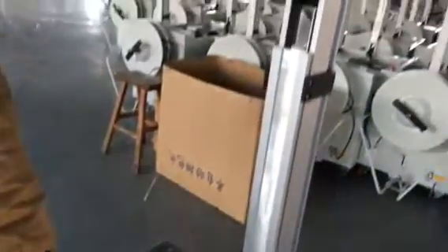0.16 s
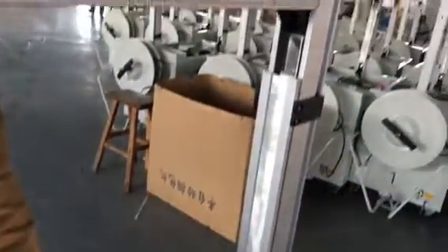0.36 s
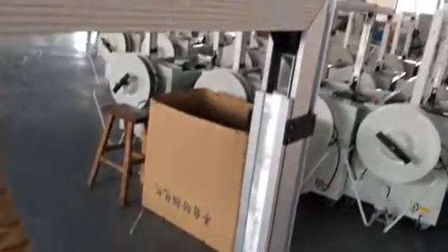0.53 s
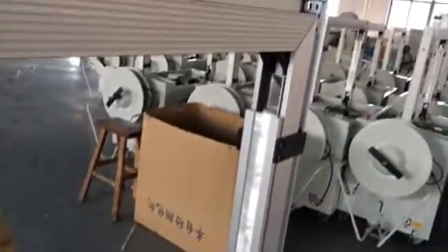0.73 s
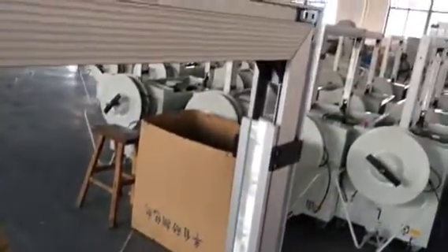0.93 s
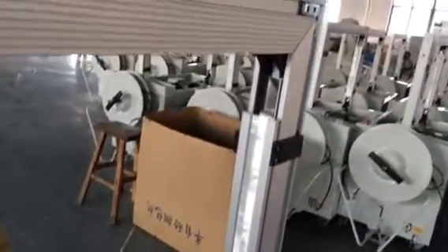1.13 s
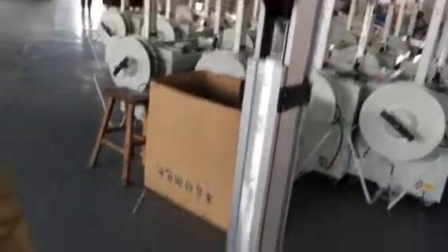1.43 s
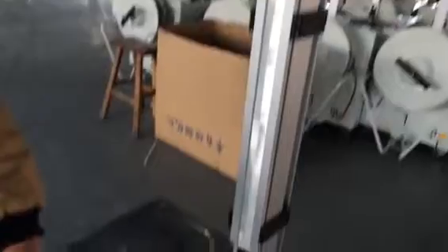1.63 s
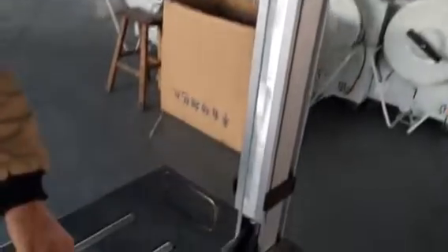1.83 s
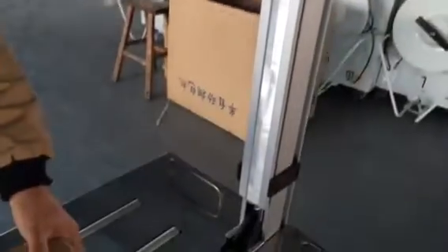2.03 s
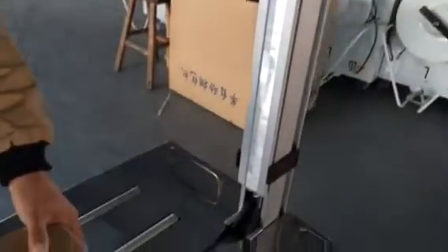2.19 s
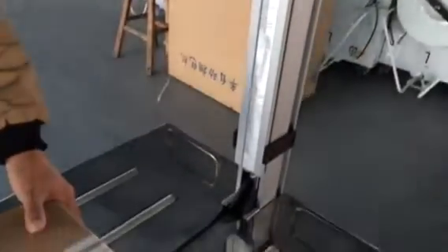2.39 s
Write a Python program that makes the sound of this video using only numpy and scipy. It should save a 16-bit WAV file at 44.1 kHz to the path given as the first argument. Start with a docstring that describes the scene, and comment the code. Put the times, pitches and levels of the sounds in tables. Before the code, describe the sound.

A strapping machine cycles close by in an echoing workshop with low hum. Carton scuffs at 0.2 s precede a hard double clunk at 0.31. Rollers whine and plastic strap hisses from 0.45, snapping at 1.05. After a brief lull, strap rattles harshly from 1.27 to 1.73 over singing rollers, with a heavy thump at 1.63 and closing double knock. Soft scuffs and metallic table bumps follow from 2.0 to 2.35.

```python
"""A low hum, workshop noise and the thin whine of idling rollers open the scene: shaped noise and narrow resonances.
A strapping machine then runs one cycle. Clamps knock (damped modes and noise bursts), and the plastic strap hisses
along its guide (stick-slip noise) and snaps tight. It rattles loudly through the arch while the rollers sing.
The singing ends with a double knock, and the carton is slid over the table with scuffs and ringing bumps."""
import sys
import numpy as np
from scipy import signal
from scipy.fft import rfft, irfft, next_fast_len
from scipy.io import wavfile

SR = 44100
rng = np.random.default_rng(int(sys.argv[2]) if len(sys.argv) > 2 else 0)


def to_wav(s):
    """Save 16-bit WAV."""
    ch = np.atleast_2d(s).T  # columns
    pcm = np.round(np.clip(ch, -1, 1) * 32767)  # PCM
    wavfile.write(sys.argv[1], SR, pcm.astype(np.int16))


N = 112454
TIME = np.arange(N) / SR  # seconds

# In every table relative_db sets proportions within one spectrum, and tilt_db_per_octave acts above 500 Hz.
# Workshop noise: time_s, level_db
SHOP_LEVEL = [(0, -36), (.6, -37), (1.2, -39.5), (1.65, -39), (1.9, -40.5), (2.12, -33.5), (2.55, -37)]
# Its spectrum: frequency_hz, relative_db
SHOP_COLOUR = [(70, -28.5), (110, -8.5), (150, -0.5), (200, -1), (310, -2), (480, -13.5), (680, -11.5),
               (950, -8), (1500, -13.5), (1850, -11), (2250, -19), (4000, -25), (6000, -35.5), (15500, -48)]
# Low rumble of the drive and frame: time_s, level_db
RUMBLE_LEVEL = [(0, -43.5), (.45, -46), (.85, -43), (1.1, -50.5), (1.45, -42.5), (1.7, -66), (1.95, -57),
                (2.12, -39), (2.55, -45)]
# Its spectrum: frequency_hz, relative_db
RUMBLE_COLOUR = [(35, -7), (55, -0.5), (85, -7), (120, -2), (190, -22), (400, -30), (15500, -90)]
# Resonances of the motor hum: centre_hz, width_hz, relative_db
HUM_PEAKS = [(143.7, 23, 3), (283, 12, -8)]
HUM_DB = -48.5
# Whine of the idling drive: time_s, level_db
IDLE_LEVEL = [(0, -46.5), (1.2, -54), (1.78, -35), (1.9, -41), (2.0, -39.5), (2.2, -42.5), (2.55, -48)]
# Its resonances: centre_hz, width_hz, relative_db
IDLE_PEAKS = [(1853, 6.8, -4), (1788, 70, -2)]
# Roller speed: time_s, share_of_full_speed
ROLLER_SPEED = [(.43, 0.9), (.49, 1.0), (.87, 1.0), (.94, 0.98), (1.0, 0.94), (1.3, 0.95), (1.42, 1.0),
                (1.725, 1.0), (1.76, 0.87), (1.82, 0.96)]
# Rough whirr of the rollers: time_s, level_db
WHIRR_LEVEL = [(.39, -53), (.44, -36.5), (.485, -37), (.6, -35), (.86, -37), (.94, -25), (1.03, -39.5),
               (1.12, -50), (1.24, -51), (1.3, -21.5), (1.4, -31.5), (1.6, -27.5), (1.73, -25.5),
               (1.76, -31), (1.8, -58)]
# Its resonances at full speed: centre_hz, width_hz, relative_db
WHIRR_PEAKS = [(1731, 110, -1), (1920, 180, -1.5), (3726, 280, -3.5), (5580, 260, -10.5)]
# Clear singing of the rollers under load: time_s, level_db
SING_LEVEL = [(.42, -63), (.48, -37.5), (.72, -35.5), (1.0, -36), (1.15, -56), (1.3, -41), (1.44, -22),
              (1.56, -26), (1.68, -23.5), (1.715, -21.5), (1.745, -50)]
# Its partials at full speed: centre_hz, width_hz, relative_db
SING_PEAKS = [(1724, 7.1, -5), (1806, 8, -0.5), (1868, 9.7, 4.5), (1952, 32, 0.5), (3735, 32, -3.5),
              (7400, 91, -11)]
# Carton and strap rubbing: start_s, length_s, level_db, tilt_db_per_octave
RUBS = [(0.193, 0.034, -29.5, -5), (0.247, 0.042, -32.5, -1.5), (0.288, 0.034, -27, 1),
        (0.393, 0.032, -27.5, -6.5), (0.902, 0.082, -31.5, 7), (1.105, 0.028, -33, 3),
        (1.142, 0.02, -31, 1), (2.063, 0.052, -30.5, -2), (2.132, 0.04, -37, 0.5),
        (2.228, 0.056, -30, -0.5), (2.301, 0.044, -41.5, -1.5)]
# Their spectrum before tilt: frequency_hz, relative_db
RUB_COLOUR = [(60, -13), (150, -6.5), (320, 2.5), (600, -2.5), (980, 1), (1450, -2), (2200, -4),
              (4000, -11), (7000, -16.5), (11000, -29), (15500, -34)]
# Strap squeaking and scraping on edges: start_s, length_s, level_db, centre_hz, width_hz
SQUEAKS = [(0.196, 0.026, -41, 10600, 1300), (0.907, 0.012, -23.5, 1730, 750),
           (0.939, 0.024, -25.5, 1610, 600), (0.914, 0.054, -30, 2580, 900), (1.144, 0.023, -38, 4370, 901),
           (1.229, 0.015, -36, 7080, 500), (1.274, 0.011, -17.5, 3700, 1300),
           (1.291, 0.023, -22.5, 6000, 1500), (1.288, .022, -25, 10500, 3000),
           (1.317, 0.0083, -20.5, 8400, 1420), (1.336, 0.011, -22, 3720, 800),
           (1.377, 0.012, -26, 12900, 700), (1.43, 0.009, -19.5, 9600, 1610),
           (1.438, 0.008, -23.5, 8530, 700), (1.448, 0.015, -24, 9350, 500),
           (1.531, 0.009, -24.5, 8100, 1500), (1.55, 0.022, -37, 1230, 700),
           (1.579, 0.014, -26.5, 1400, 400), (2.133, 0.027, -45.5, 13300, 2500)]
# Strap slapping the guide: start_s, level_db, decay_s, tilt_db_per_octave
SLAPS = [(0.197, -35, 0.033, 4), (0.388, -21, .02, 3), (.398, -20.5, 0.027, 2), (0.514, -25, 0.008, 7.5),
         (.638, -25, 0.0098, 9), (1.047, -16.5, 0.021, 4), (1.221, -34.5, 0.022, 5), (1.274, -14, 0.021, 2),
         (1.285, -13.5, 0.0069, -0.5), (1.304, -15, 0.021, 5), (1.319, -17, 0.003, -2),
         (1.33, -14.5, 0.0085, 7), (1.354, -12, 0.0064, 6), (1.3673, -15, 0.0052, -4.5),
         (1.405, -18, 0.014, 10), (1.427, -14, 0.013, -2.5), (1.474, -16.5, 0.014, -3),
         (1.487, -14.5, .009, -5.5), (1.504, -13, 0.005, -2.5), (1.514, -17, 0.0069, 3),
         (1.531, -17.5, 0.011, 5.5), (1.552, -11.5, 0.013, -3), (1.581, -15, 0.016, -2),
         (1.602, -27, 0.0032, 2), (1.776, -29.5, 0.024, 1.5), (1.958, -38, 0.033, -0.5),
         (1.99, -39, 0.03, 0), (2.068, -40, 0.025, 9), (2.097, -36, 0.022, 9), (2.234, -28.5, 0.028, -0.5),
         (2.323, -32, 0.014, -1.5)]
# Their spectrum before tilt: frequency_hz, relative_db
SLAP_COLOUR = [(100, -11.5), (400, -10.5), (1000, 1.5), (1700, 2), (2400, 3.5), (3500, 1.5), (5000, -4),
               (8000, -9.5), (12000, -15), (15500, -21.5)]
# Carton bumping the steel table: start_s, level_db, decay_s
BUMPS = [(0.198, -38, 0.054), (0.4, -25, 0.033), (2.069, -32, 0.043), (2.158, -30, 0.023),
         (2.237, -23, 0.021), (2.27, -27, 0.019), (2.323, -31.5, 0.02)]
# Resonances of the table: centre_hz, width_hz, relative_db
TABLE_PEAKS = [(770, 91, -6.5), (950, 120, 4.5), (1085, 40, -4.5), (1387, 22, -1), (1518, 52, 0.5),
               (2000, 250, -7.5), (3180, 190, -12.5)]
# Clamps and cutter knocking: start_s, level_db, decay_s, tilt_db_per_octave, housing_ring_db
KNOCKS = [(.203, -24.5, 0.02, -1.5, -4), (0.3104, -7, 0.0057, -1, -10.5), (0.3137, -5.5, 0.0033, 0, -5.5),
          (1.411, -18, 0.0064, 0, 2), (1.453, -9.5, 0.0037, -1, 0), (1.4748, -9, 0.0038, 0, -1),
          (1.487, -16.5, 0.014, 1, -4), (1.6265, -12, 0.0018, -2, -4), (1.631, -25.5, 0.017, -5, 1),
          (1.711, -23, 0.0073, 0, 3), (1.7227, -8, 0.0025, 2.5, -1), (1.7362, -9, 0.0045, -3.5, -2.5),
          (1.969, -29, 0.012, -3.5, 4)]
# Spectrum of their rattle before tilt: frequency_hz, relative_db
KNOCK_COLOUR = [(60, -39), (150, -8.5), (260, -2.5), (420, 5), (740, -7.5), (950, -8), (1350, -6),
                (2000, -25), (2500, -11), (4000, -18), (5800, -9.5), (9000, -29.5), (15500, -34)]
# Modes of the housing, around which each knock varies in level: frequency_hz, mean_level_db, t60_s
HOUSING_MODES = [(378, -10.5, 0.03), (510, -7.5, 0.054), (622, -9, 0.033), (782, -6.5, 0.018),
                 (1120, -15.5, 0.038), (1386, -12.5, .06)]
# Frame thudding: start_s, level_db, pitch_hz, t60_s
THUDS = [(0.22, -19.5, 93, 0.052), (0.317, -8.5, 149, 0.045), (1.625, 0, 69, 0.02), (1.736, -22, 159, 0.16)]
# Hard edges meeting: start_s, level_db, decay_s
CRACKS = [(0.3142, -16, 0.0019), (0.516, -22, 0.0051), (1.047, -9, .0006), (1.2755, -12, .001),
          (1.3549, -8, 0.0025), (1.474, -10, .002), (1.606, -17, .0015), (1.6265, -7, 0.0011),
          (1.723, -9, .002), (1.7355, -9.5, 0.0019), (1.9915, -33, 0.0018), (2.083, -32, 0.0051),
          (2.107, -38, .003), (2.134, -33, 0.0033), (2.246, -26, 0.0015)]
# Their spectrum: frequency_hz, relative_db
CRACK_COLOUR = [(300, -11), (1500, 12.5), (4000, -4), (6500, -1), (10000, -6), (15500, -4.5)]
# Strap sliding in its guide, before flutter: time_s, level_db
SLIDE_LEVEL = [(.43, -62), (.52, -27.5), (.6, -31), (.72, -29), (.84, -26), (.96, -26), (1.04, -26.5),
               (1.09, -68), (1.2, -68)]
# Its spectrum: frequency_hz, relative_db
SLIDE_COLOUR = [(240, -67), (400, -15.5), (873, -14.5), (914, -21.5), (1790, -3.5), (2590, -11.5),
                (3680, -8.5), (4350, -13.5), (10600, -11.5), (15500, -11.5)]
# Strap driven through the arch, before flutter: time_s, level_db
RUSH_LEVEL = [(1.22, -47), (1.268, -24.5), (1.282, -23.5), (1.32, -18.5), (1.39, -24), (1.445, -21.5),
              (1.468, -27.5), (1.49, -19.5), (1.53, -27.5), (1.595, -24.5), (1.635, -31), (1.715, -26),
              (1.75, -37.5), (1.85, -60)]
# Its spectrum: frequency_hz, relative_db
RUSH_COLOUR = [(88, -46), (150, -6), (213, -6), (248, -21), (366, -15), (1000, -10.5), (1600, -8),
               (1800, -3.5), (2270, -15.5), (2920, -7), (5230, -14.5), (9360, -14.5), (15500, -21.5)]
# Spectrum of the reverberation: frequency_hz, relative_db
ROOM_COLOUR = [(60, -13), (300, -2), (1500, 5.5), (4000, 3.5), (8000, 0.5), (15500, -3.5)]

RUB_ATTACK_S, RUB_RELEASE_S = 0.0045, 0.014
SQUEAK_ATTACK_S, SQUEAK_RELEASE_S = 0.0022, 0.0033
IMPACT_ATTACK_S = 0.00027  # slaps and bumps
KNOCK_ATTACK_S, KNOCK_RATTLE_DB = 0.0026, -1
EDGE_HZ = 4020  # above this the strap's edges are heard, below it its body
ROOM_T60_S, ROOM_DB, ROOM_DELAY_S = 0.68, -14.5, 0.017
LOW_CUT_HZ, CUTOFF_HZ = 56, 15450


def from_db(db):
    """Decibel law: 20 dB is a tenfold amplitude."""
    return 10 ** (np.asarray(db) / 20)


def rms_one(x):
    """Normalisation to unit root-mean-square."""
    return x / np.sqrt(np.mean(x ** 2) + 1e-20)


def level(curve):
    """Envelope, linear in decibels between its points and practically silent outside them."""
    times, db = np.transpose(curve)
    return from_db(np.interp(TIME, times, db, left=-120, right=-120))


def colour(x, points, tilt_db=0):
    """Minimum-phase filtering: a folded cepstrum makes a spectrum causal; white noise keeps its level."""
    size = 2 * next_fast_len(len(x))
    hz = np.maximum(np.fft.rfftfreq(size, 1 / SR), 1)
    at, db = np.transpose(points)
    shape_db = np.interp(np.log(hz), np.log(at), db)
    shape_db = shape_db + tilt_db * np.log2(np.maximum(hz, 500))
    bass_cut = hz / np.hypot(hz, at[0])
    gain = rms_one(from_db(shape_db) * bass_cut)
    cepstrum = irfft(np.log(gain))
    cepstrum[1:size // 2] *= 2
    cepstrum[size // 2 + 1:] = 0
    response = np.exp(rfft(cepstrum))
    return irfft(rfft(x, size) * response)[:len(x)]


def friction(per_s, spread_db, smooth, size=N):
    """Stick-slip friction: random clicks of uneven strength over a share of smooth hiss."""
    slips = rng.random(size) < per_s / SR
    signs = rng.choice([-1, 1], size)
    strengths = from_db(spread_db * np.minimum(rng.exponential(1, size), 4))
    clicks = rms_one(slips * signs * strengths)
    return rms_one(clicks + smooth * rng.standard_normal(size))


def flutter(rate_hz):
    """Random modulation: low-passed noise of unit spread, halved in amplitude at the given rate."""
    hz = np.fft.rfftfreq(N, 1 / SR)
    return rms_one(irfft(rfft(rng.standard_normal(N)) / (1 + (hz / rate_hz) ** 2), N))


def resonant_noise(hz, centre, width, size):
    """Resonance: noise concentrated around a centre, to half amplitude at the edges of its width."""
    return irfft(rfft(rng.standard_normal(size)) / (1 + ((hz - centre) / width * 2) ** 2), size)


def resonances(peaks, steadiness, speed=1):
    """Noise-driven resonances shifted in pitch by speed; steadiness evens their envelope towards a tone."""
    hz, out = np.fft.rfftfreq(N, 1 / SR), 0
    lead_s = np.cumsum((speed - 1) * np.ones(N)) / SR
    for centre, width, db in peaks:
        ring = signal.hilbert(resonant_noise(hz, centre, width, N))
        ring = ring * np.exp(2j * np.pi * centre * lead_s)
        evened = ring.real / np.abs(ring) ** np.clip(steadiness, 0, 1)
        out = out + from_db(db) * rms_one(evened)
    return rms_one(out)


def strike(t, attack_s, decay_s):
    """Impact envelope: a linear rise under an exponential decay."""
    return np.minimum(t / attack_s, 1) * np.exp(-t / decay_s)


def stroke(t, length_s, attack_s, release_s):
    """Sliding-contact envelope: linear attack, hold, exponential release."""
    return np.minimum(t / attack_s, 1) * np.exp(-np.maximum(t - length_s, 0) / release_s)


def damped_sine(t, hz, t60_s):
    """Damped vibration of one mode, falling 60 dB in t60."""
    return np.sin(2 * np.pi * hz * t) * np.exp(-np.log(1000) * t / t60_s)


def add(out, start_s, sound):
    """Superposition of a sound at its start time."""
    start = int(start_s * SR)
    out[start:start + len(sound)] += sound[:N - start]


def background():
    """Broadband noise of the workshop and drive, with motor hum as broad low resonances."""
    shop = level(SHOP_LEVEL) * colour(rng.standard_normal(N), SHOP_COLOUR)
    rumble = level(RUMBLE_LEVEL) * colour(rng.standard_normal(N), RUMBLE_COLOUR)
    hum = from_db(HUM_DB) * resonances(HUM_PEAKS, steadiness=0.54)
    return shop + rumble + hum


def rollers():
    """Rotating resonance: idle whine at fixed pitch; whirr and steadier singing rise and fall with speed."""
    speed = np.interp(TIME, *np.transpose(ROLLER_SPEED))
    idle = level(IDLE_LEVEL) * resonances(IDLE_PEAKS, steadiness=0.85)
    whirr = level(WHIRR_LEVEL) * resonances(WHIRR_PEAKS, steadiness=0.31, speed=speed)
    sing = level(SING_LEVEL) * resonances(SING_PEAKS, steadiness=0.95, speed=speed)
    return idle + whirr + sing


def rubs():
    """Sliding friction: each scuff is a short stroke of coloured stick-slip noise."""
    out, t = np.zeros(N), TIME[:SR // 4]
    for start_s, length_s, db, tilt_db in RUBS:
        grain = friction(per_s=1500, spread_db=4, smooth=0.99, size=len(t))
        scuff = grain * stroke(t, length_s, RUB_ATTACK_S, RUB_RELEASE_S)
        add(out, start_s, from_db(db) * colour(scuff, RUB_COLOUR, tilt_db))
    return out


def squeaks():
    """Friction-driven resonance: the strap catches on an edge and rings roughly around one pitch."""
    out, t = np.zeros(N), TIME[:SR // 4]
    hz = np.fft.rfftfreq(len(t), 1 / SR)
    for start_s, length_s, db, centre, width in SQUEAKS:
        ring = rms_one(resonant_noise(hz, centre, width, len(t)))
        shape = stroke(t, length_s, SQUEAK_ATTACK_S, SQUEAK_RELEASE_S)
        add(out, start_s, from_db(db) * ring * shape)
    return out


def slaps():
    """Repeated contact: each slap of the strap is a decaying burst of coloured chatter."""
    out, t = np.zeros(N), TIME[:SR // 4]
    for start_s, db, decay_s, tilt_db in SLAPS:
        chatter = friction(per_s=4000, spread_db=2.0, smooth=0.55, size=len(t))
        burst = chatter * strike(t, IMPACT_ATTACK_S, decay_s)
        add(out, start_s, from_db(db) * colour(burst, SLAP_COLOUR, tilt_db))
    return out


def bumps():
    """Plate resonance: each bump briefly raises the ringing of the table's sheet."""
    swing, t = np.zeros(N), TIME[:SR // 4]
    for start_s, db, decay_s in BUMPS:
        add(swing, start_s, from_db(db) * strike(t, IMPACT_ATTACK_S, decay_s))
    return swing * resonances(TABLE_PEAKS, steadiness=0.18)


def knocks():
    """Modal excitation: a hard contact rattles as noise and sets the damped modes of the housing ringing."""
    out, t = np.zeros(N), TIME[:SR // 4]
    for start_s, db, decay_s, tilt_db, ring_db in KNOCKS:
        burst = rng.standard_normal(len(t)) * strike(t, KNOCK_ATTACK_S, decay_s)
        rattle = from_db(KNOCK_RATTLE_DB) * colour(burst, KNOCK_COLOUR, tilt_db)
        ring = np.zeros(len(t))
        for k, (hz, mode_db, t60_s) in enumerate(HOUSING_MODES):
            strength = from_db(mode_db + 2 * rng.standard_normal())
            ring += (-1) ** k * strength * damped_sine(t, hz, t60_s)  # alternate polarity
        add(out, start_s, from_db(db) * (from_db(ring_db) * ring + rattle))
    return out


def thuds():
    """Damped oscillation: a heavy blow sets the frame swinging at one low pitch."""
    out, t = np.zeros(N), TIME[:SR // 2]
    for start_s, db, pitch_hz, t60_s in THUDS:
        add(out, start_s, from_db(db) * damped_sine(t, pitch_hz, t60_s))
    return out


def cracks():
    """Impulsive contact: a very short noise burst has a broad, bright spectrum."""
    out, t = np.zeros(N), TIME[:SR // 20]
    for start_s, db, decay_s in CRACKS:
        burst = rng.standard_normal(len(t)) * np.exp(-t / decay_s)
        add(out, start_s, from_db(db) * colour(burst, CRACK_COLOUR))
    return out


def strap():
    """Stick-slip noise: a hiss in the guide, then a rasp in the arch whose body and edges flutter separately."""
    slide = friction(per_s=4900, spread_db=8.5, smooth=1.6) * level(SLIDE_LEVEL)
    slide = colour(slide * from_db(1.0 * flutter(68)), SLIDE_COLOUR)
    rush = friction(per_s=5000, spread_db=1.5, smooth=0.49) * level(RUSH_LEVEL)
    rush = colour(rush * from_db(1.04 * flutter(110)), RUSH_COLOUR)
    body = signal.sosfiltfilt(signal.butter(2, EDGE_HZ, fs=SR, output="sos"), rush)
    edges = rush - body
    return slide + body * from_db(2.2 * flutter(64)) + edges * from_db(2.5 * flutter(81))


def room(x):
    """Diffuse reverberation: convolution with delayed, coloured noise that decays exponentially."""
    t = TIME[:SR]
    decay = np.exp(-np.log(1000) * t / ROOM_T60_S) * (t > ROOM_DELAY_S)
    tail = colour(rng.standard_normal(SR) * decay, ROOM_COLOUR)
    unit_energy_tail = tail / np.sqrt(np.sum(tail ** 2))
    return from_db(ROOM_DB) * signal.fftconvolve(x, unit_energy_tail)[:N]


def scene():
    """Superposition of the machine, its reverberation, and the unreverberated thuds and background."""
    machine = rollers() + rubs() + squeaks() + slaps() + bumps() + knocks() + cracks() + strap()
    return (background() + machine + thuds() + room(machine))[None]


def record(dry):
    """Band limiting and soft saturation: deep bass is cut, peaks are rounded, the top is removed."""
    thin = signal.sosfilt(signal.butter(2, LOW_CUT_HZ, "high", fs=SR, output="sos"), dry)
    rounded = np.tanh(thin)
    return signal.sosfilt(signal.ellip(12, .1, 90, CUTOFF_HZ, fs=SR, output="sos"), rounded)


dry = scene()
out = record(dry)
to_wav(out)
```